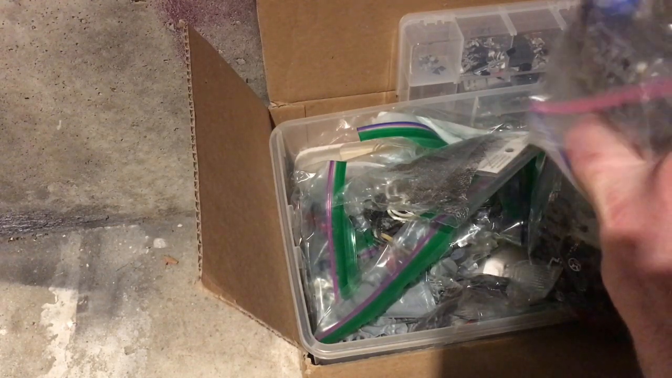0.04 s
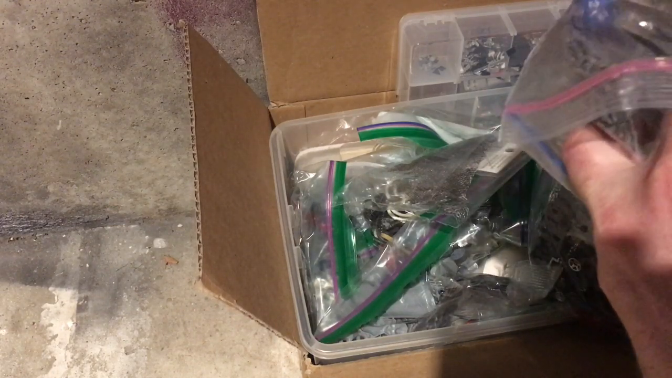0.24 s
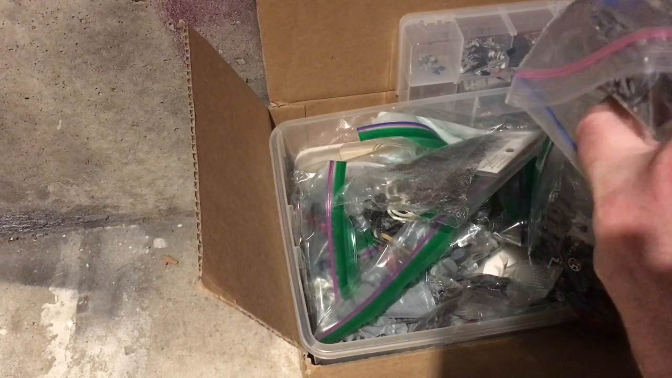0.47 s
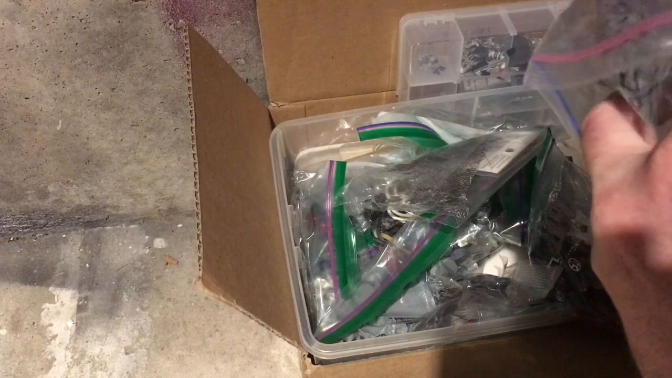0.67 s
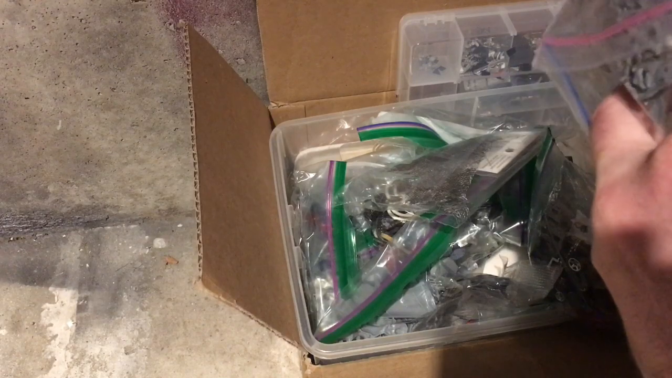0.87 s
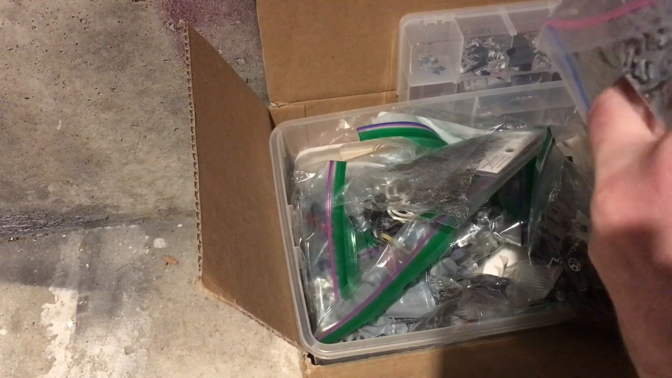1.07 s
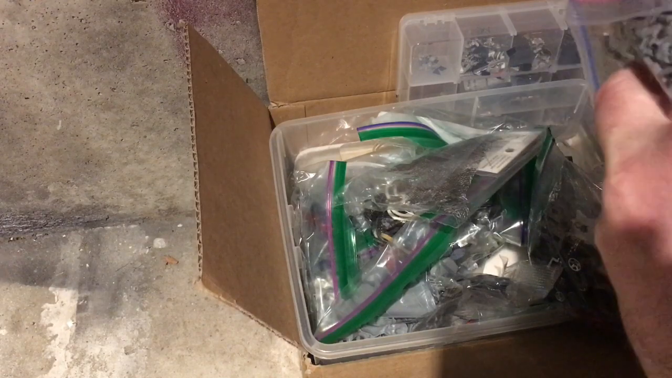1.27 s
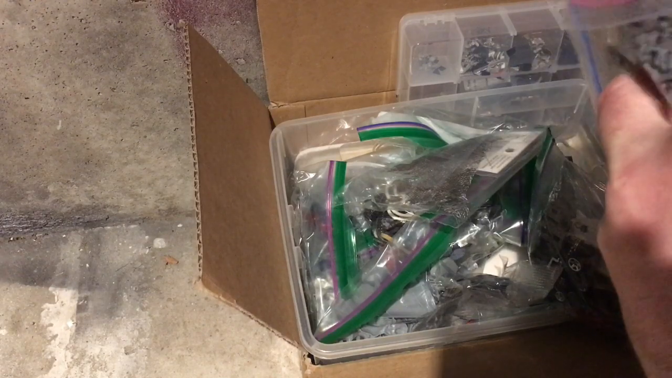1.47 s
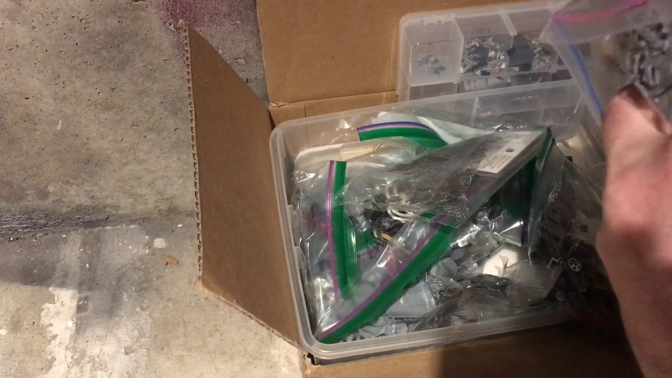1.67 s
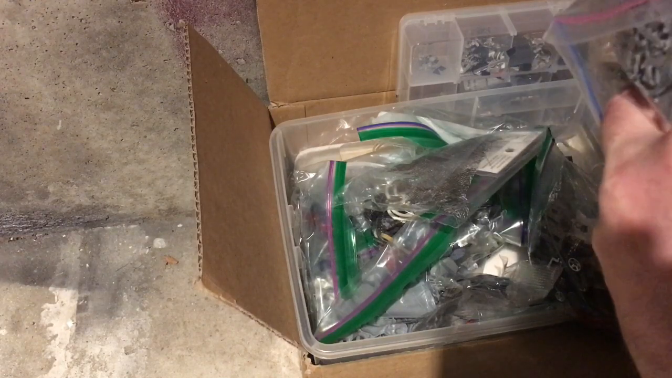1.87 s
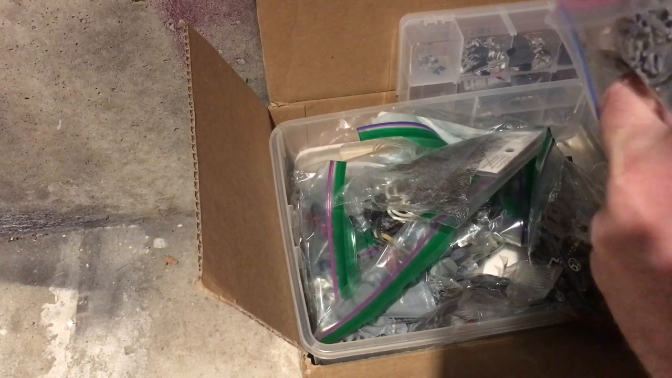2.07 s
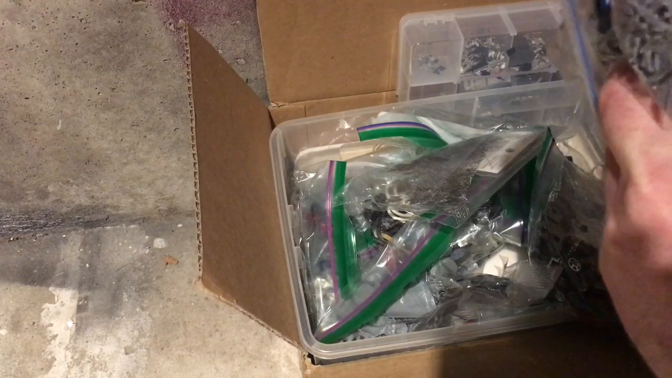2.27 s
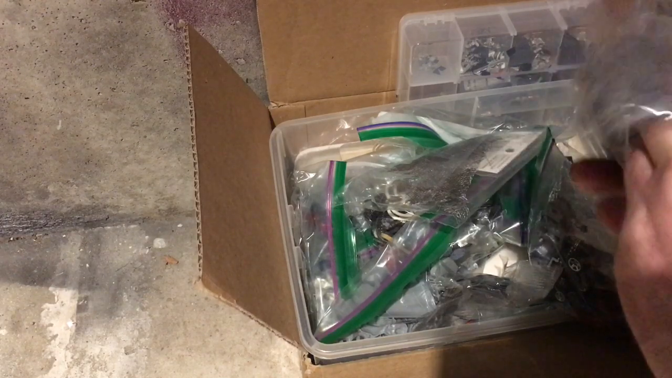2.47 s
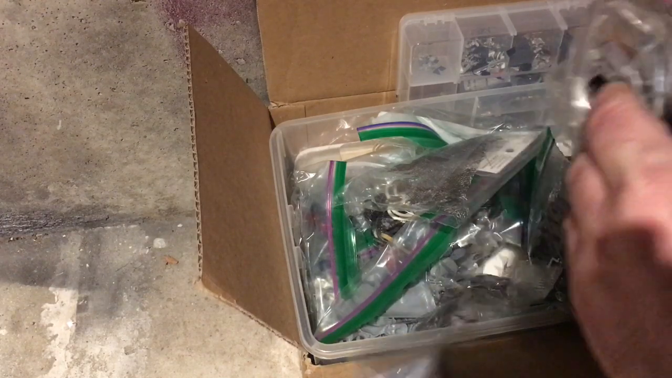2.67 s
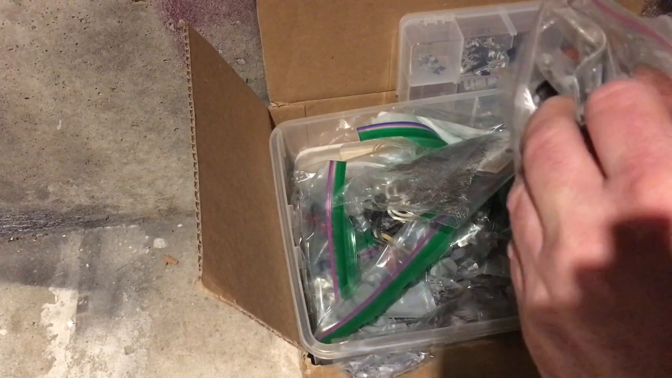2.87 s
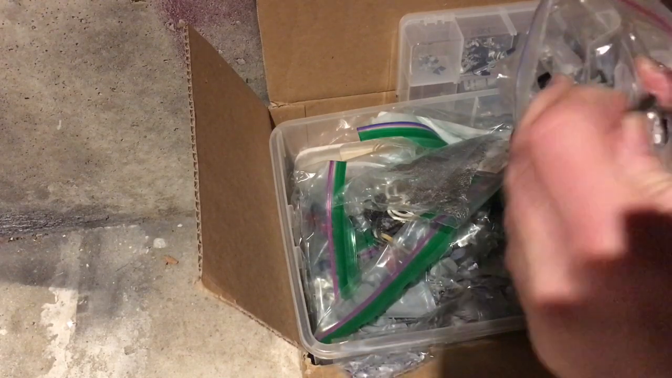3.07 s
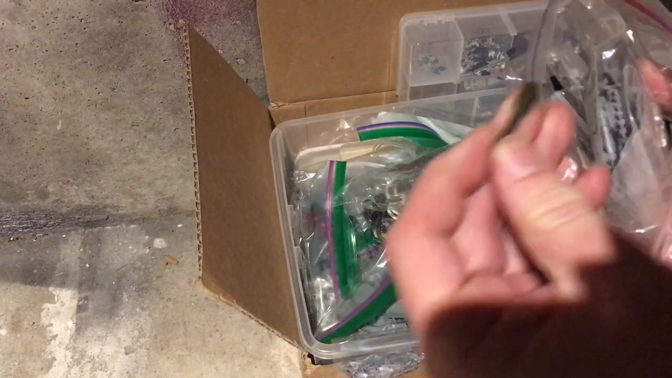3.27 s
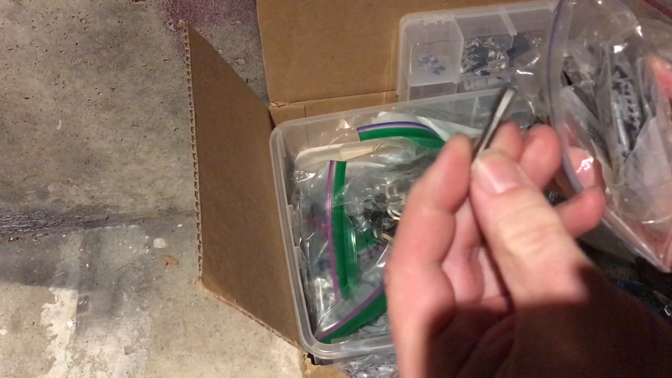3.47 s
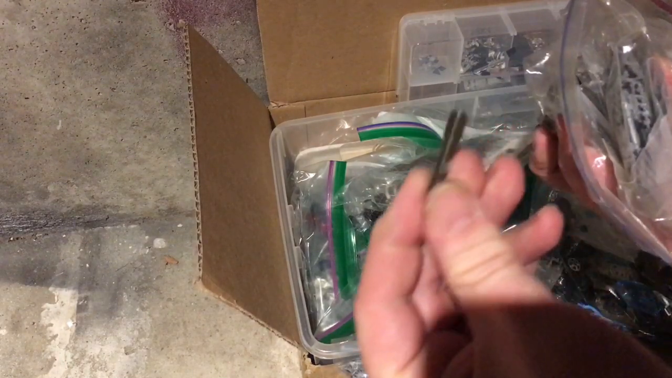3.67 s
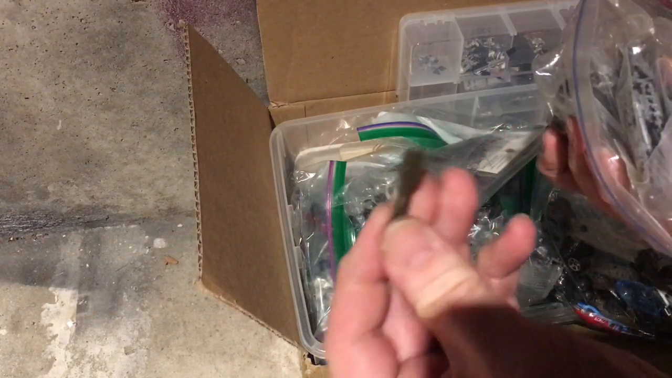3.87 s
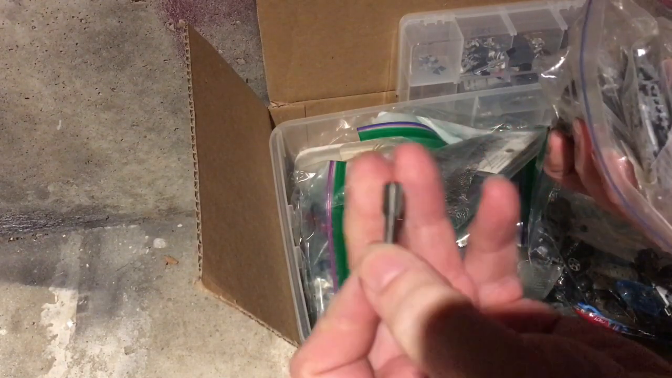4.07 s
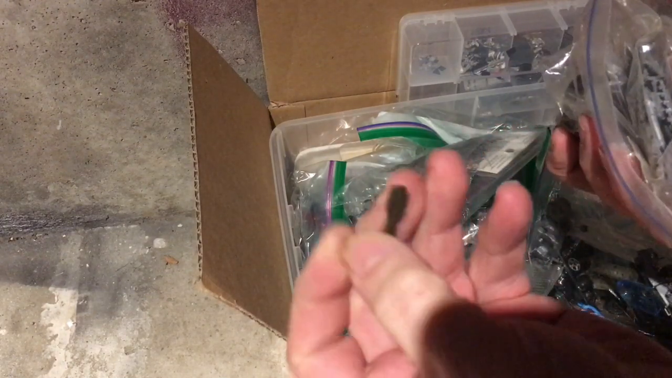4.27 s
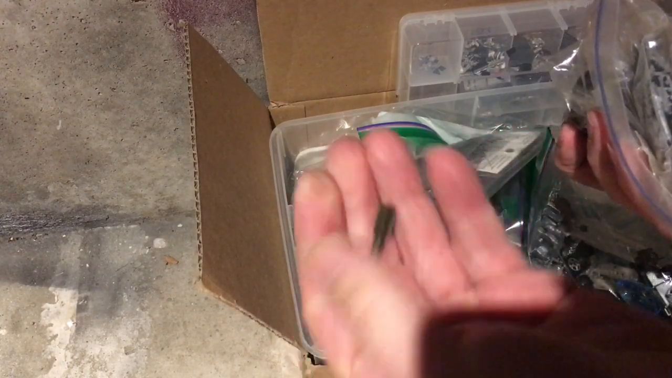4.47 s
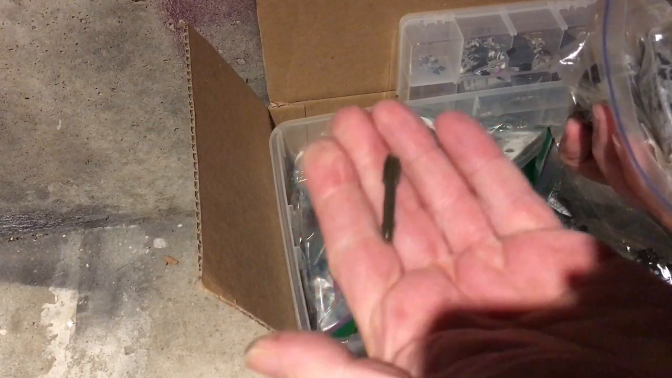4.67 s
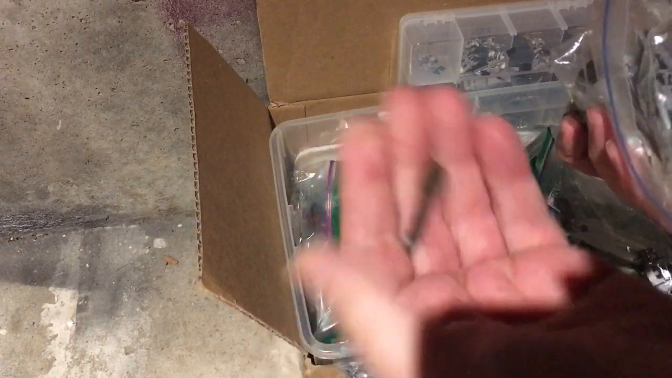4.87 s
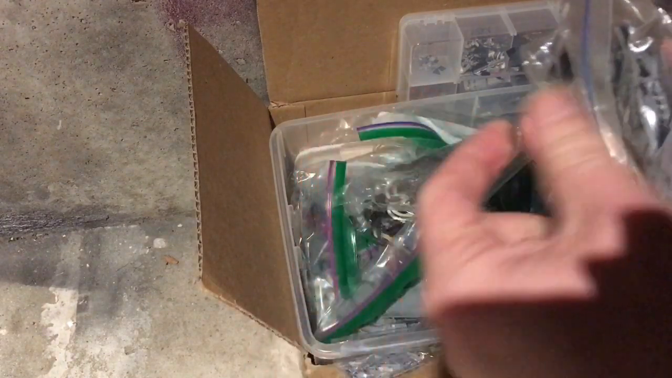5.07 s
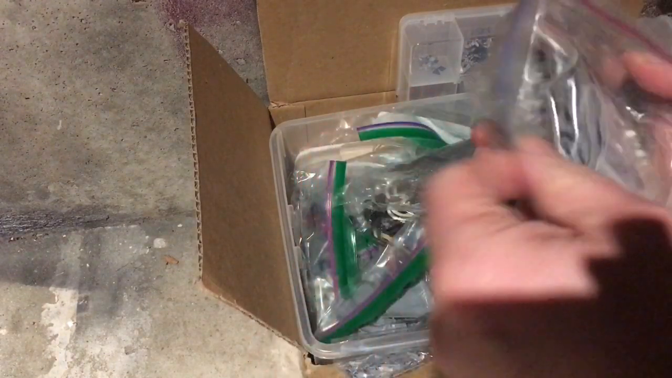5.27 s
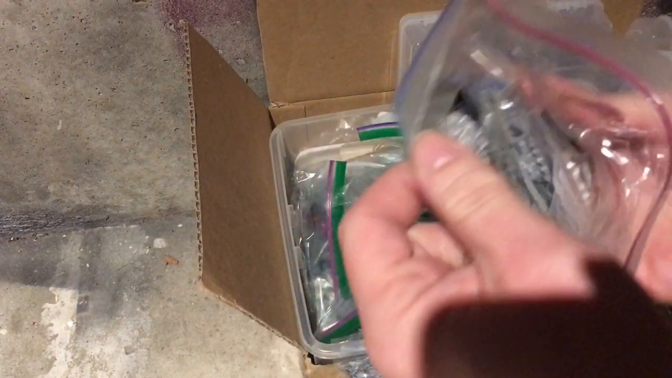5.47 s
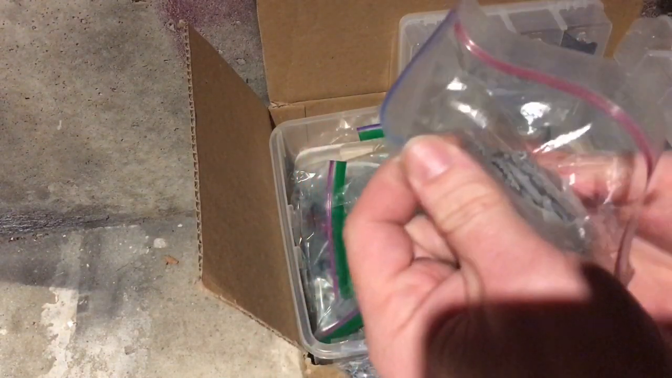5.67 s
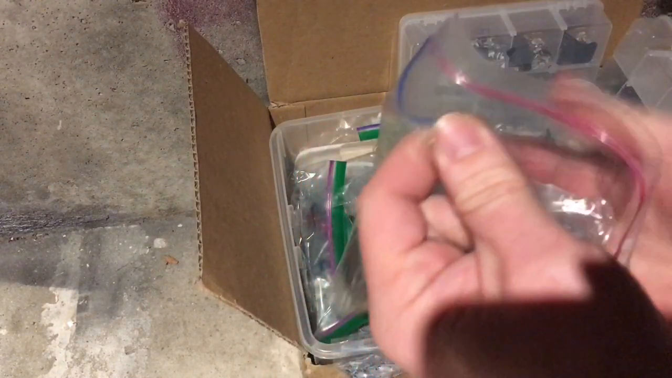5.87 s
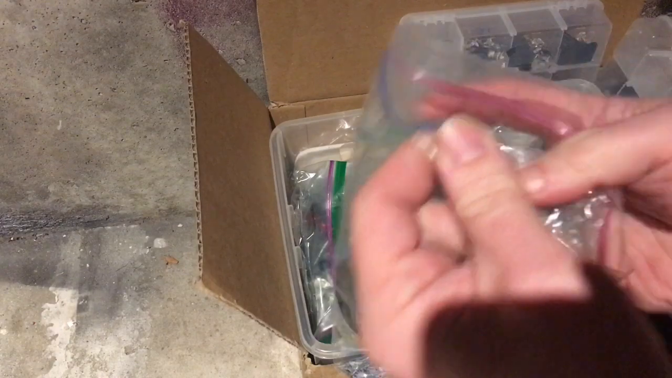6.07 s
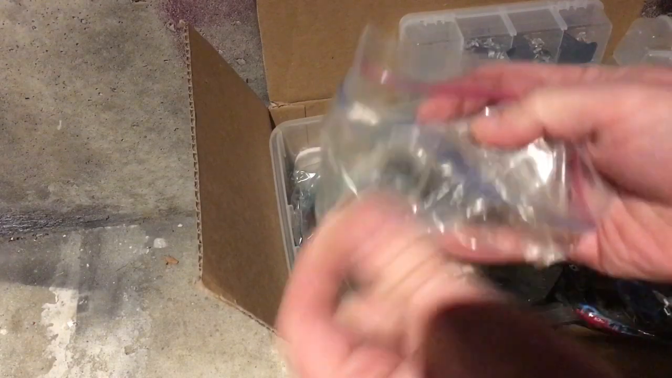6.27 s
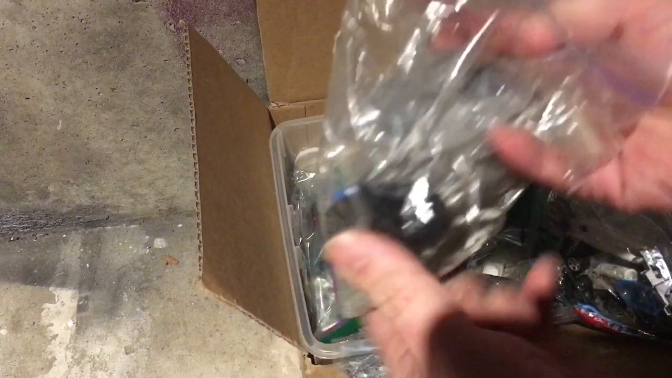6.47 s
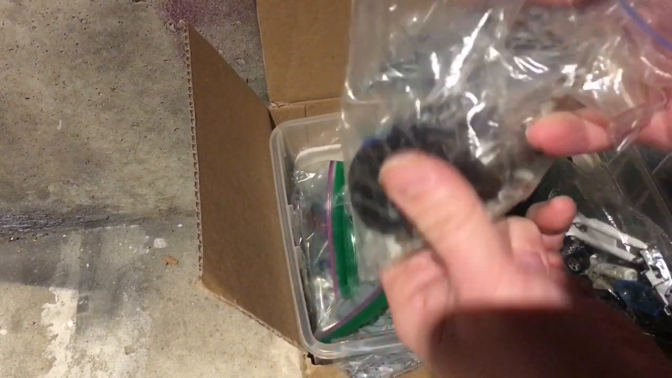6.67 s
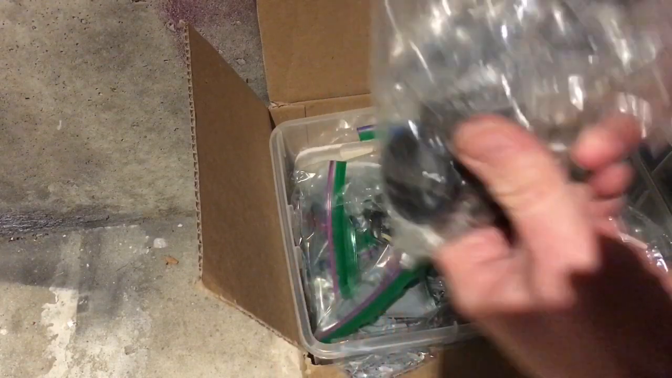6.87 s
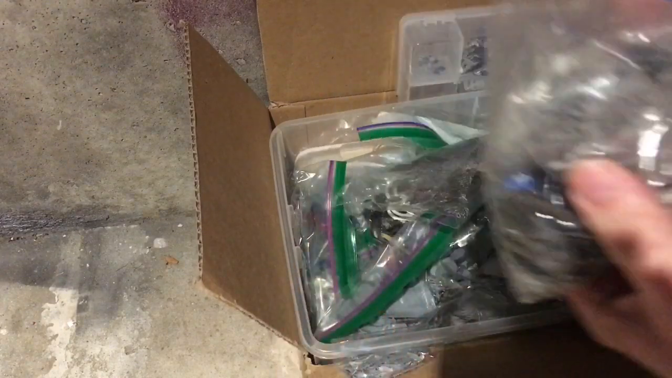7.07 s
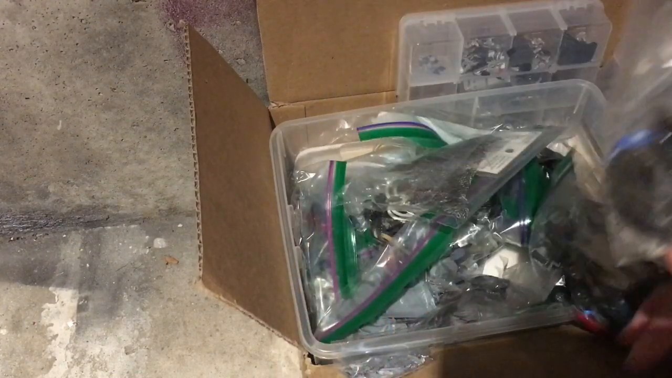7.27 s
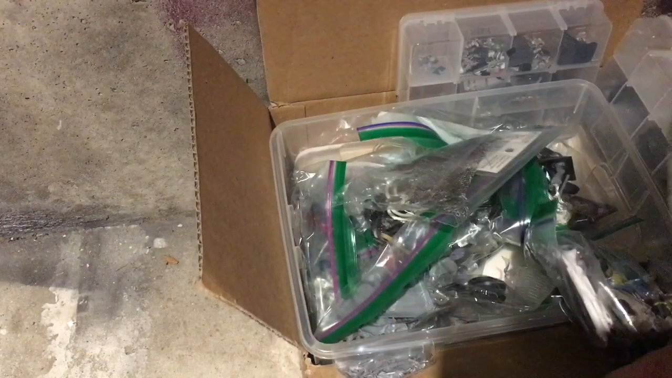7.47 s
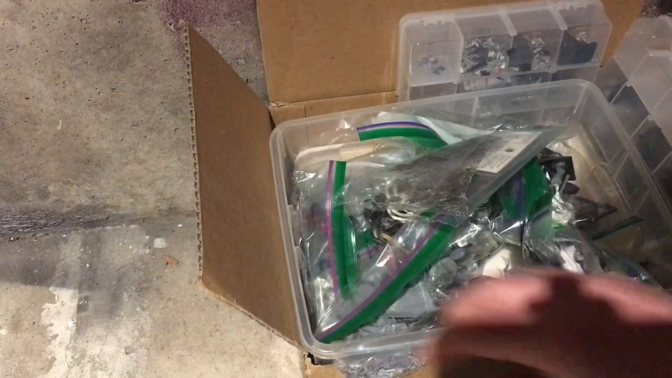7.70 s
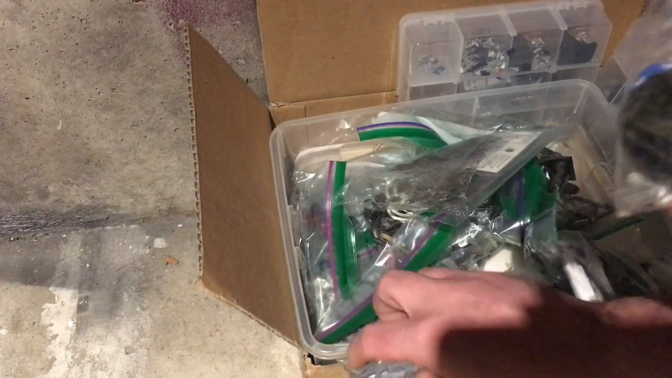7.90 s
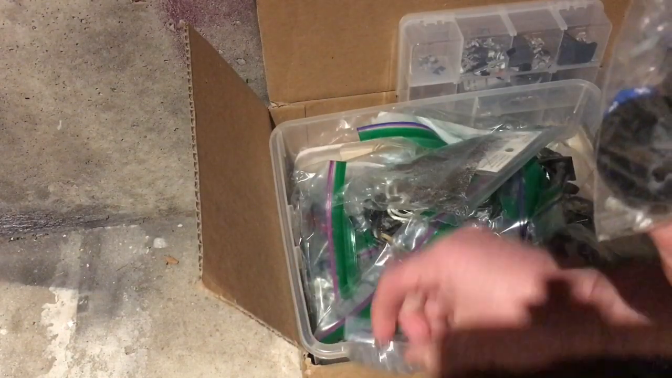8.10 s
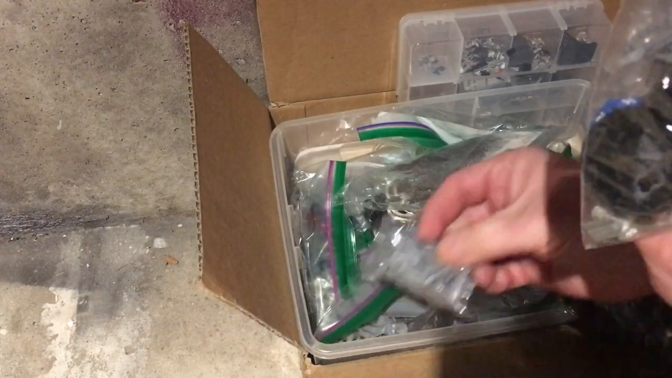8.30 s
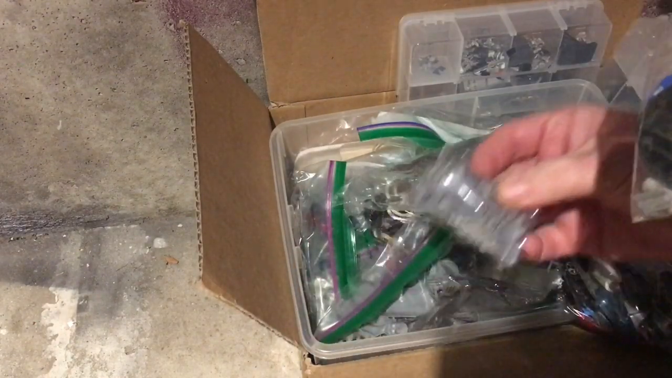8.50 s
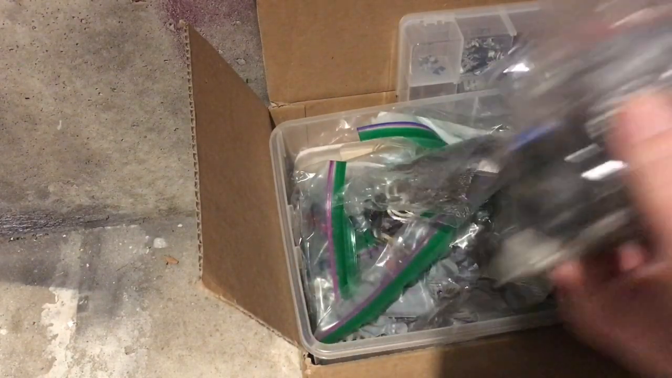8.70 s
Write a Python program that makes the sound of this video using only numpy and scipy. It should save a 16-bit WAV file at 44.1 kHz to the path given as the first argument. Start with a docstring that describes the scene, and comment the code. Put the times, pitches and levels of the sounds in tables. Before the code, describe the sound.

Close crisp plastic-bag crinkle with sharp little snaps, a loud double pop near the start, then near quiet, then busier rustling in a small room.

```python
"""Sharp snaps of thin plastic film over a sliding rustle: hands rummage in bags of small parts.
The snaps are noise kicks through panel bands; the rustle is clumped buckles and sliding noise, shaped
by the grip of the hands. A seal rips in quick clicks and one fold pops twice, loudly, in ringing modes.
The parts bump a tub and fingertips slide faintly; a small room answers, with a soft rumble and hiss."""
import sys
import numpy as np
from scipy import signal
from scipy.fft import rfft, irfft, next_fast_len
from scipy.io import wavfile
from scipy.ndimage import uniform_filter1d

SR = 44100
rng = np.random.default_rng(int(sys.argv[2]) if len(sys.argv) > 2 else 0)


def output_pcm(signal):
    """Save a mono or channel-first signal as 16-bit PCM at the path in sys.argv[1].

    Samples are clipped to [-1, 1] before scaling.
    """
    pcm = np.clip(np.atleast_2d(signal).T, -1, 1) * 32767
    wavfile.write(sys.argv[1], SR, np.round(pcm).astype(np.int16))


N = 385434


def snaps():
    """A crease flips: a hard click and a few quick slips ring the panel beside it and spit a bright edge."""
    # single snaps of the film: start_s, panel_peak_db, panel_hz (middle of its band),
    # edge_db (sharp edge against the panel)
    film_snaps = [(0.0692, -16.5, 3020, -5.5), (0.111, -31, 2230, 10.5), (0.2335, -26, 2870, 0),
                  (0.245, -25.5, 3070, -1), (0.2856, -26, 2900, 8.5), (0.2965, -20.5, 2060, -21),
                  (0.3203, -23, 2600, 1.5), (0.625, -28, 1700, -12), (0.639, -29, 1300, -8),
                  (0.653, -27, 1300, -6), (0.6675, -23, 3030, 2), (0.539, -34, 4550, -5),
                  (0.7216, -28, 3520, -5), (0.7626, -40, 4030, 6), (0.821, -28, 3890, -33),
                  (0.832, -29, 3490, -20), (0.8542, -29, 3720, 1), (0.901, -42, 3000, 2),
                  (0.941, -22, 1630, 2), (0.9477, -16, 2160, 4), (1.021, -27, 2460, -18),
                  (1.038, -38, 4000, 1), (1.0487, -24, 1820, -18), (1.0573, -31, 2520, 4),
                  (1.166, -39, 3500, 9), (1.172, -28, 3200, 3), (1.1837, -25.5, 3170, 8.5),
                  (1.2219, -34.5, 3210, 12), (1.264, -35, 2460, 9), (1.272, -32, 2000, 7),
                  (1.308, -32, 2860, 1), (1.3227, -30, 2350, 10), (1.366, -38.5, 1940, 13),
                  (1.408, -29, 2110, 1), (1.4194, -24.5, 2750, -19), (1.4483, -32.5, 2870, -9),
                  (1.5255, -33.5, 3480, 8.5), (1.5602, -35, 2480, 12), (1.612, -26, 2480, 8),
                  (1.6484, -26, 3200, -8), (1.8034, -29, 2260, -2), (1.811, -36, 2510, -14),
                  (1.8538, -36, 2900, 6.5), (1.8967, -35.5, 3160, 8), (1.937, -33.5, 1410, 1),
                  (2.108, -26, 1940, 5), (2.1165, -28, 2630, -6), (2.142, -34, 3500, -8),
                  (2.1587, -33, 2200, 7), (2.183, -23, 2400, -1), (2.192, -25, 3500, 5.5),
                  (2.2225, -29.5, 2400, 3), (2.231, -27, 3500, 5), (2.278, -43, 2500, 0),
                  (2.379, -9, 2757, -2.5), (2.463, -20.5, 2965, 4), (2.5196, -18.5, 2710, -1),
                  (2.5621, -23, 2218, -20), (2.6756, -1.5, 3100, -5), (2.779, -27, 3500, -3),
                  (2.9137, -31, 3600, -7), (3.0043, -34.5, 3000, 6), (3.04, -41, 1530, 3),
                  (3.0615, -36.5, 3220, 0), (3.156, -42, 2270, 3), (3.175, -38, 3230, -9),
                  (3.22, -38, 1394, -23), (3.273, -31.5, 2140, -13), (3.388, -44.5, 1550, -5),
                  (3.4236, -40.5, 2380, -1.5), (3.444, -50, 1500, -4), (3.521, -42.5, 1500, 3),
                  (3.548, -36.5, 1980, 2.5), (3.5689, -43, 2900, -17), (3.7694, -38.5, 2410, 2),
                  (3.7964, -45, 2060, -3.5), (3.8548, -42, 1610, -23), (3.865, -44, 3000, 3.5),
                  (3.963, -36.5, 2570, 5), (4.0853, -48, 3000, -3), (4.1384, -44.5, 1774, -7.5),
                  (4.276, -42.5, 2066, -15.5), (4.533, -46, 2190, -25), (4.6429, -35, 2410, -9),
                  (4.741, -36.5, 2420, -20), (4.7713, -36, 3470, -2), (4.832, -41.5, 2160, 10.5),
                  (5.037, -40, 2400, -9.5), (5.081, -38.5, 2400, -1), (5.101, -39, 3180, -14),
                  (5.134, -40.5, 1490, 8), (5.152, -35.5, 4500, -8), (5.2037, -19.5, 4200, -2),
                  (5.2123, -18.5, 4240, -7), (5.243, -37, 3000, -2), (5.3124, -28, 2460, 9),
                  (5.34, -22.5, 2200, 2), (5.3744, -25, 2630, 0), (5.3926, -25, 3900, 5),
                  (5.5144, -29, 2820, 8), (5.543, -27, 3200, 4), (5.583, -22, 3330, 6),
                  (5.6039, -14.5, 3920, 6), (5.664, -22.5, 3280, 11), (5.699, -34, 5000, 5),
                  (5.7954, -26, 3640, 10), (5.849, -25, 3130, 5), (6.021, -22, 3500, 2),
                  (6.114, -17.5, 3440, -0.5), (6.138, -15, 3540, -3), (6.197, -21.5, 2540, -12),
                  (6.2264, -16, 3370, 2), (6.2398, -21, 3420, 6), (6.262, -21.5, 3550, -20),
                  (6.3038, -34, 2850, 10), (6.3453, -44, 2160, 20), (6.375, -20, 3000, 10.5),
                  (6.4742, -27, 2690, 1), (6.495, -29, 2250, -8), (6.519, -32, 2654, 3.5),
                  (6.656, -25, 2090, 9.5), (6.6826, -21.5, 2040, 6), (6.693, -24, 2200, 3),
                  (6.728, -26, 1880, 11), (6.7698, -26, 2000, 6.5), (6.841, -30.5, 4000, 6),
                  (6.8719, -20, 1390, -1), (6.9146, -33, 3010, 2), (6.9373, -22.5, 1930, 2),
                  (6.968, -25.5, 3000, 1), (7.018, -31, 2000, 2), (7.0416, -29.5, 2090, 6),
                  (7.0583, -20.5, 2890, 6.5), (7.0752, -29, 2320, 1), (7.1106, -23, 2280, 0.5),
                  (7.3066, -18.5, 3830, -2), (7.322, -20.5, 4000, -5), (7.378, -17.5, 2690, 3),
                  (7.408, -19.5, 4000, -10), (7.471, -26.5, 2520, -8), (7.5068, -17.5, 2500, -14),
                  (7.5677, -26.5, 3070, -10), (7.8247, -13, 2150, -3), (7.8478, -15, 2910, 2),
                  (7.9397, -15, 2710, 3), (7.943, -15, 3000, -8), (7.949, -15, 2610, -5),
                  (7.9612, -12.5, 2060, -15), (8.017, -15.5, 3250, -1.5), (8.04, -25, 4500, -7),
                  (8.0719, -18.5, 3200, -19), (8.08, -22, 3090, -15), (8.1348, -19, 4500, -9),
                  (8.1597, -17, 3130, 2), (8.275, -31.5, 3450, -42), (8.3276, -36.5, 1280, -8),
                  (8.6997, -43, 1570, 1)]
    out, t = np.zeros(N), np.arange(1000) / SR
    all_slips = rng.standard_normal((len(film_snaps), len(t)))
    for (start_s, panel_db, panel_hz, edge_db), slips in zip(film_snaps, all_slips):
        kick = slips * abs(slips) * gain_of(-60 * t / 0.017)
        kick[0] = 5  # the hard click
        panel = peaked(band(kick, panel_hz / 1.9, panel_hz * 1.92))
        broad = peaked(below(band(kick, 500, 9000), 6700))
        # a weak edge also means less broad sound in the body
        body = panel + 0.59 * min(gain_of(edge_db + 5.5), 1) * broad
        edge = band(kick * gain_of(-60 * t / 0.02), 4800, 14000)
        snap = peaked(body) + gain_of(edge_db) * peaked(edge)
        add(out, start_s, gain_of(panel_db) * snap)
    return out


def pops():
    """A stiff fold tears free in a few milliseconds of kicks that ring its modes."""
    # the loud double pop: start_s, fold_peak_db, tearing_s (how long the fold keeps tearing),
    # spit_db (bright), thump_db (both against the fold)
    double_pop = [(2.6537, -5, 0.008, -2, -13), (2.6738, -4.5, 0.007, -2.5, -23)]
    # modes of the stiff fold: mode_hz, level_db (relative), t60_s
    fold_modes = [(2570, -17, 0.011), (2710, 2, 0.014), (3200, -7.5, 0.02), (3220, 9.5, 0.0054),
                  (5650, -15, 0.0064)]
    out, t = np.zeros(N), np.arange(4000) / SR
    all_slips = rng.standard_normal((len(double_pop), len(t)))
    for (start_s, fold_db, tearing_s, spit_db, thump_db), slips in zip(double_pop, all_slips):
        onset = np.minimum(t / 0.0013, 1)
        # a slower fade while tearing, a steep one after it
        fade_db = -2500 * np.maximum(t - tearing_s, 0) - 600 * t
        kicks = slips * onset * gain_of(fade_db)
        ringing = signal.fftconvolve(kicks, ring(fold_modes, t))[:len(t)]
        fold = peaked(band(ringing, 900, 9000))
        spit = peaked(band(kicks, 4000, 14000))
        thump = peaked(band(kicks, 400, 2000))
        pop = fold + gain_of(spit_db) * spit + gain_of(thump_db) * thump
        add(out, start_s, gain_of(fold_db) * pop)
    return out


def rip():
    """The seal pulls apart in stick-slip: one click a slip through taut film, slightly uneven and growing."""
    # the pull on the seal: start_s, end_s, slips_per_s, end_peak_db (reached at the end, give or take)
    seal_pull = (2.3835, 2.4005, 375, -11)
    start_s, end_s, slips_per_s, end_db = seal_pull
    slip_times = np.arange(start_s, end_s, 1 / slips_per_s)
    out = np.zeros(N)
    click = peaked(band(signal.unit_impulse(200), 1500, 7200))
    for slip_s, (late, size) in zip(slip_times, rng.standard_normal((len(slip_times), 2))):
        slip_db = end_db + 1.5 * size - 200 * (end_s - slip_s)  # grows 200 dB a second
        add(out, slip_s + 0.0003 * late, gain_of(slip_db) * click)
    return out


def rustle():
    """The same buckles sound through the loose parts, wide folds and fine creases; a grip packs them closer."""
    # colour of the rustle before its three bands are levelled: freq_hz, density_db (per Hz)
    film_colour = [(59, -16.5), (130, -1), (263, 1.5), (430, -0.5), (800, -6), (2010, -3.5), (4960, -1),
                   (9240, 4.5), (13600, 7.5), (15800, -2.5)]
    rest_per_s, grip_per_s = 210, 990  # buckles a second in a resting and in a gripped bag
    rest_slide_db, grip_slide_db = -6, -2.5  # steady sliding against the buckles
    *levels, gripped = handling()
    per_s = rest_per_s + (grip_per_s - rest_per_s) * gripped
    slide_db = rest_slide_db + (grip_slide_db - rest_slide_db) * gripped
    film = colour(crackle(per_s, spread_db=1.0, smooth_db=slide_db), film_colour)
    film /= uniform_filter1d(abs(film), size=3000)  # the hand, not chance, sets the slow level
    parts, below_creases = below(film, 850), below(film, 5200)
    folds, creases = below_creases - parts, film - below_creases
    return sum(level * evened(part) for level, part in zip(levels, (parts, folds, creases)))


def crackle(per_s, spread_db, smooth_db):
    """Random buckles in clumps, a few large, each a brief spit with its own colour, over steady sliding."""
    # one buckle sets off a flurry that dies away: clump_s is its time constant
    clumps_per_s, clump_size, clump_s = 55, 4, 0.009
    starts = (rng.random(N) < clumps_per_s / SR) * rng.exponential(clump_size, N)
    clumps = 1 + signal.lfilter([1], [1, -np.exp(-1 / (clump_s * SR))], starts)
    clumps /= clumps.mean()
    size = gain_of(spread_db * np.minimum(rng.exponential(1, N), 4.5))
    buckles = size * (rng.random(N) < clumps * per_s / SR)
    grain_of_buckle = rng.integers(0, 40, N)
    t, out = np.arange(400) / SR, np.zeros(N)
    for k, hz in enumerate(np.geomspace(900, 12000, 40)):
        burst = rng.standard_normal(400) * gain_of(-60 * t / 0.005)
        grain = evened(burst) + 0.9 * evened(band(burst, hz / 1.6, hz * 1.4))
        out += signal.oaconvolve(buckles * (grain_of_buckle == k), grain)[:N]
    sliding = np.sqrt(clumps) * rng.standard_normal(N)
    return evened(out) + gain_of(smooth_db) * sliding


def handling():
    """Levels of parts, folds and creases, and the gripped share: each grip rises, holds and lets go."""
    # the bag never quite rests: time_s, folds_db
    unrest_levels = [(0, -60), (.5, -52), (1.4, -55), (1.9, -56), (2.06, -52), (2.9, -52.5), (3.07, -66.5),
                     (3.5, -75.5), (4.5, -78), (5.0, -80.5), (5.16, -75), (5.45, -51), (6.5, -56.5),
                     (7.15, -62), (7.7, -76.5), (8.3, -67), (8.63, -69), (8.74, -67.5)]
    # squeezes and pulls of the hands: full_s (start of full strength), hold_s, folds_db, rise_s, release_s,
    # creases_db, parts_db (both against the folds)
    hand_grips = [(0.0, 0.087, -41.5, .01, 0.1, -6, -11.5), (0.097, 0.0042, -39.5, 0.1, 0.17, 0.5, -11),
                  (0.298, 0.0062, -40.5, 0.049, 0.043, -3, -26),
                  (0.339, 0.0053, -35.5, 0.042, 0.045, -4.5, -13.5),
                  (0.402, 0.0031, -33, 0.031, 0.031, -14, -19.5), (.59, .01, -50.5, 0.12, 0.06, 1.5, -19),
                  (0.625, 0.046, -45, 0.011, 0.07, -3.5, -18), (1.049, 0.048, -48, 0.085, 0.083, -4, -16),
                  (1.6, 0.031, -50, 0.46, 0.043, -0.5, -12), (1.776, 0.0052, -53, 0.11, 0.022, -3, -21),
                  (2.115, 0.34, -39, 0.029, 0.7, -4.5, -16),
                  (2.69, 0.0061, -25, 0.0059, 0.096, -10.5, -15.5),
                  (4.538, 0.02, -69, 0.0058, 0.12, -21, 10), (4.843, 0.017, -56, 0.084, 0.045, -8.5, -7),
                  (5.192, 0.205, -41, 0.044, 0.019, -2.5, -9.5), (5.53, 0.12, -42.5, 0.047, 0.043, 0, -9.5),
                  (5.839, 0.024, -42, 0.61, 1, -0.5, -10.5), (6.025, 0.0045, -40, 0.051, 0.051, 3, -14),
                  (6.124, 0.0067, -36, 0.2, 0.29, -3, -11.5),
                  (6.377, 0.0057, -35.5, 0.0079, 0.037, 7.5, -10),
                  (6.559, 0.035, -40, 0.022, 0.21, -5, -12), (6.674, 0.03, -34.5, 0.069, 0.096, -7, -13),
                  (6.869, 0.055, -36.5, 0.098, 0.17, -4.5, -11.5),
                  (7.18, 0.051, -41, 0.0038, 0.041, -3, -14), (7.212, 0.0052, -36.5, 0.028, 0.22, -3, -7),
                  (7.378, 0.11, -39.5, 0.11, 0.1, -9.5, -8.5), (7.61, 0.0084, -51, 0.15, 0.018, -4.5, -8),
                  (7.825, 0.096, -39, 0.0075, 0.11, -6, -1.5),
                  (8.081, 0.003, -43.5, 0.34, 0.44, -3.5, -8.5),
                  (8.573, 0.014, -48, 0.35, 0.034, -2.5, -10)]
    rest_offsets_db = np.array([[-12], [0], [-9]])  # parts, folds, creases against the folds
    span_db = 20  # what a grip gains over its rise and loses over its release
    t = np.arange(0, N + 64, 64) / SR
    # doubled dB give powers, so that rest and grips add as energy
    rest = gain_of(2 * (np.interp(t, *np.transpose(unrest_levels)) + rest_offsets_db))
    grip = 0
    for full_s, hold_s, folds_db, rise_s, release_s, creases_db, parts_db in hand_grips:
        before = np.maximum(full_s - t, 0) / max(rise_s, 0.002)
        after = np.maximum(t - full_s - hold_s, 0) / max(release_s, 0.002)
        offsets_db = np.array([[parts_db], [0], [creases_db]])
        grip = grip + gain_of(2 * (folds_db - span_db * (before + after) + offsets_db))
    gripped = (grip / (rest + grip))[1]
    curves = (*np.sqrt(rest + grip), gripped)
    return [np.interp(np.arange(N) / SR, t, curve) for curve in curves]


def bumps():
    """Soft contact of the parts rings the low modes of the tub; a brighter contact reaches the higher."""
    # bumps of the parts, against the tub and once (4.535 s) into a palm: start_s, peak_db, # contact_s (to fall
    # 60 dB), contact_hz (middle of the contact noise)
    part_bumps = [(0.626, -28, 0.01, 700), (.638, -29.5, 0.012, 600), (.653, -32.5, 0.022, 600),
                  (2.654, -22.5, 0.037, 602), (2.675, -25.5, 0.29, 610), (3.221, -43.5, .006, 900),
                  (3.55, -49.5, 0.051, 600), (4.535, -46.5, 0.2, 330), (7.387, -30.5, 0.38, 330),
                  (7.823, -20, 0.05, 950), (7.845, -28.5, 0.13, 238)]
    # modes of the tub: mode_hz, level_db (relative), t60_s
    tub_modes = [(132, 0.5, .04), (207, 0.5, 0.032), (323.7, -1.5, 0.018), (457, -0.5, 0.012),
                 (551, 2, 0.018), (650, -2.5, .015), (1168, 3, 0.019)]
    out, t = np.zeros(N), np.arange(SR // 3) / SR
    noises = rng.standard_normal((len(part_bumps), len(t)))
    for (start_s, peak_db, contact_s, contact_hz), noise in zip(part_bumps, noises):
        push = band(noise, contact_hz / 2, contact_hz * 1.6) * gain_of(-60 * t / contact_s)
        bump = signal.fftconvolve(push, ring(tub_modes, t))[:len(t)]
        add(out, start_s, gain_of(peak_db) * peaked(bump))
    return out


def rubs():
    """Skin on skin: a faint, very high hiss that swells and fades."""
    # dry fingertips slide: centre_s, level_db, half_s (centre to 1/e of the swell)
    finger_slides = [(4.195, -59, 0.021), (4.334, -64, 0.017)]
    t = np.arange(N) / SR
    swells = sum(gain_of(level_db) * np.exp(-((t - centre_s) / half_s) ** 2)
                 for centre_s, level_db, half_s in finger_slides)
    return swells * evened(band(rng.standard_normal(N), 10800, 14800))


def room(x, wet_db):
    """The direct sound, then sparse taps that die faster in the treble."""
    # decay of the small room: freq_hz, t60_s
    room_decay = [(200, 0.66), (1000, 0.6), (2800, 0.33), (5000, 0.2), (12000, 0.01)]
    taps = np.zeros(SR // 2)
    slots = np.arange(140, len(taps) - 20, 20)
    taps[slots + rng.integers(0, 20, len(slots))] = rng.choice([-1., 1.], len(slots))
    hz, t, spectrum = signal.stft(taps, SR, nperseg=256)
    decay = gain_of(-60 * t / read(room_decay, hz)[:, None])
    tail = signal.istft(spectrum * decay, SR, nperseg=256)[1]
    tail = gain_of(wet_db) * tail / np.linalg.norm(tail)
    tail[0] = 1  # the direct sound
    return signal.fftconvolve(x, tail)[:N]


def room_tone():
    """Low rumble of the building that comes and goes, over a faint even hiss."""
    # level of the rumble: time_s, level_db
    rumble_levels = [(0, -63), (.35, -52.5), (.8, -59), (1.5, -55), (1.9, -60.5), (2.7, -55), (3.05, -60.5),
                     (3.368, -51.5), (3.651, -60), (4.604, -55.5), (6.997, -58), (7.8, -53.5), (8.74, -60)]
    # colour of the room tone before rumble and hiss are levelled: freq_hz, density_db (per Hz)
    air_colour = [(15, -50), (30, -26.5), (55, 2.5), (95, -4.5), (150, -16.5), (268, -15.5), (450, -20),
                  (888, -24), (1800, -25.5), (3760, -33.5), (12800, -38), (16800, -41.5)]
    air = colour(rng.standard_normal(N), air_colour)
    low = below(air, 160)
    rumble_db = np.interp(np.arange(N) / SR, *np.transpose(rumble_levels))
    hiss_db = -67.5
    return gain_of(rumble_db) * evened(low) + gain_of(hiss_db) * evened(air - low)


def gain_of(db):
    """Amplitude factor of a level in dB."""
    return 10 ** (np.asarray(db) / 20)


def evened(x):
    """Scale to an RMS of one."""
    return x / np.sqrt(np.mean(x ** 2) + 1e-20)


def peaked(x):
    """Scale to a peak of one."""
    return x / abs(x).max()


def read(points, hz):
    """Read a curve of (Hz, value) points along a logarithmic frequency axis."""
    f, value = np.transpose(points)
    return np.interp(np.log(hz + 1), np.log(f + 1), value)


def add(mix, start_s, sound):
    """Lay a sound into the mix, cut off at its end."""
    part = mix[round(start_s * SR):][:len(sound)]
    part += sound[:len(part)]


def band(x, lo_hz, hi_hz):
    """Keep the sound between two frequencies."""
    sos = signal.butter(2, [lo_hz, min(hi_hz, 0.45 * SR)], "band", fs=SR, output="sos")
    return signal.sosfilt(sos, x)


def below(x, hz):
    """Keep the sound under a frequency, without delay."""
    return signal.sosfiltfilt(signal.butter(2, hz, fs=SR, output="sos"), x)


def colour(x, points):
    """Shape the spectrum by a curve of (Hz, dB) points."""
    size = next_fast_len(len(x))
    gain = gain_of(read(points, np.fft.rfftfreq(size, 1 / SR)))
    return irfft(rfft(x, size) * gain, size)[:len(x)]


def ring(modes, t):
    """Sum of decaying sines, one for each mode of a struck body."""
    return sum(gain_of(db - 60 * t / t60) * np.sin(2 * np.pi * hz * t) for hz, db, t60 in modes)


def scene():
    """Everything the hands do, heard in the room, over the room's own tone."""
    hands = snaps() + pops() + rip() + bumps() + rustle() + rubs()
    return (room(hands, wet_db=-18) + room_tone())[None]


def record(dry):
    """Two dips in the treble, then the band limit."""
    # response with two treble dips, as from a reflection off the floor, level beyond its ends: # freq_hz,
    # gain_db
    treble_dips = [(4200, -2), (4900, -4.5), (5500, -1), (9500, -2), (10500, -5.5), (11700, -3)]
    edge_hz = 15900
    low_pass = signal.firwin(401, edge_hz, window=("kaiser", 8), fs=SR)
    return signal.oaconvolve(colour(dry[0], treble_dips)[None], low_pass[None], "same")


dry = scene()
out = record(dry)
output_pcm(out)
```